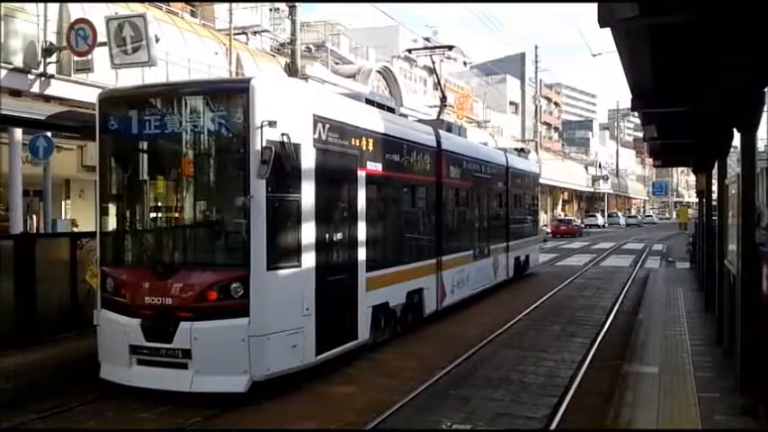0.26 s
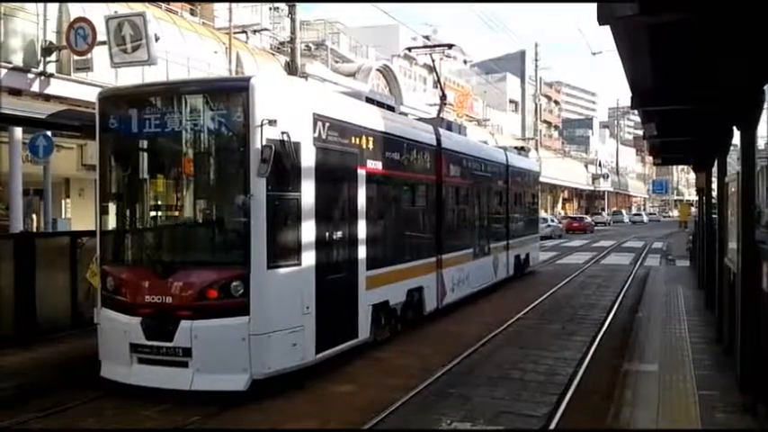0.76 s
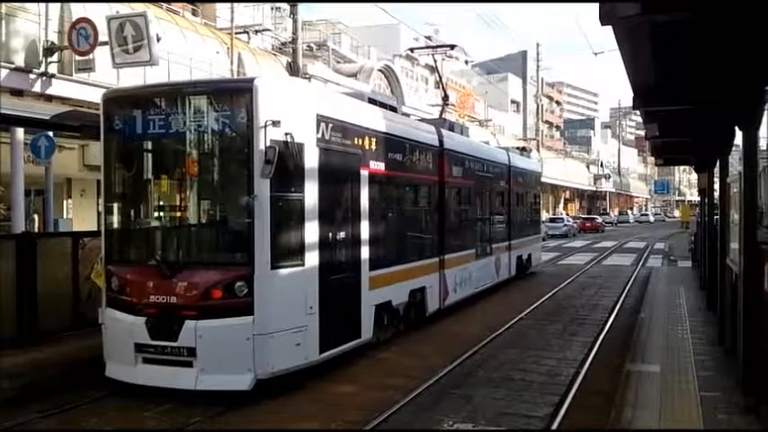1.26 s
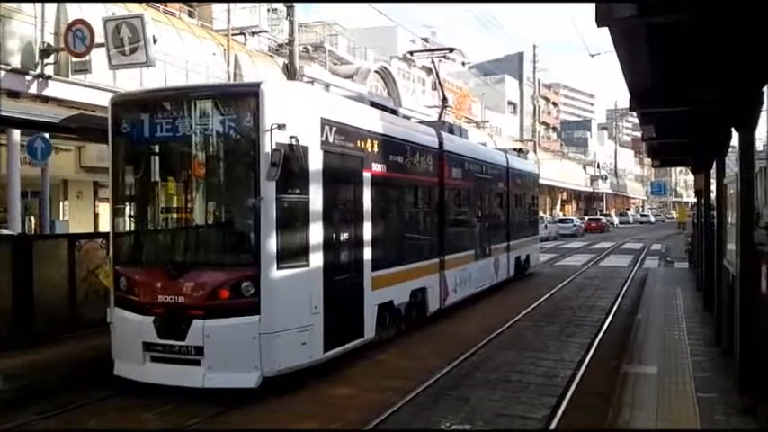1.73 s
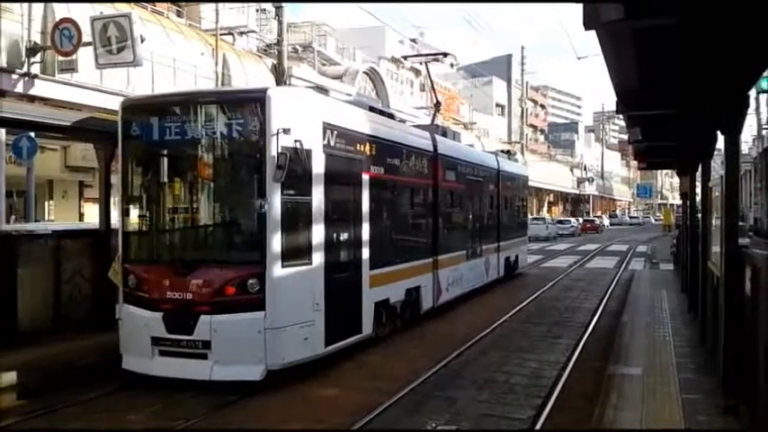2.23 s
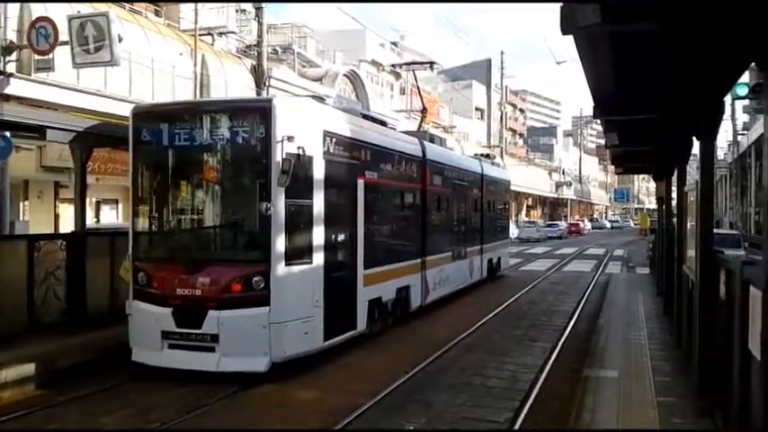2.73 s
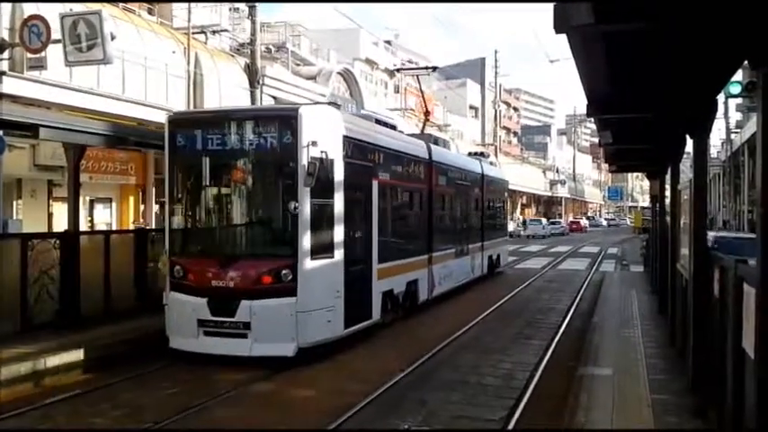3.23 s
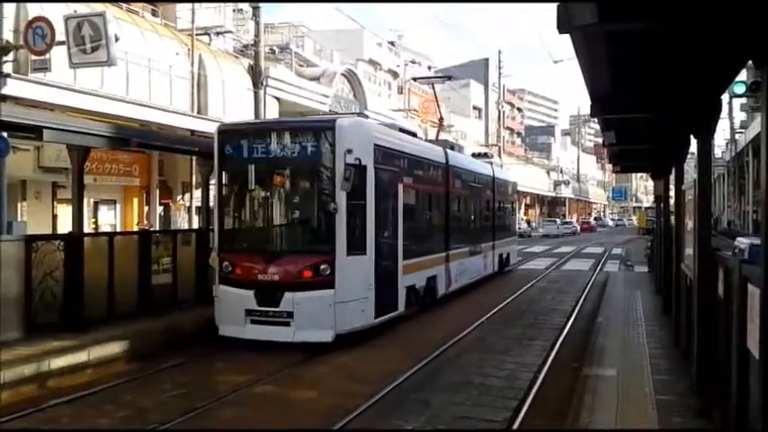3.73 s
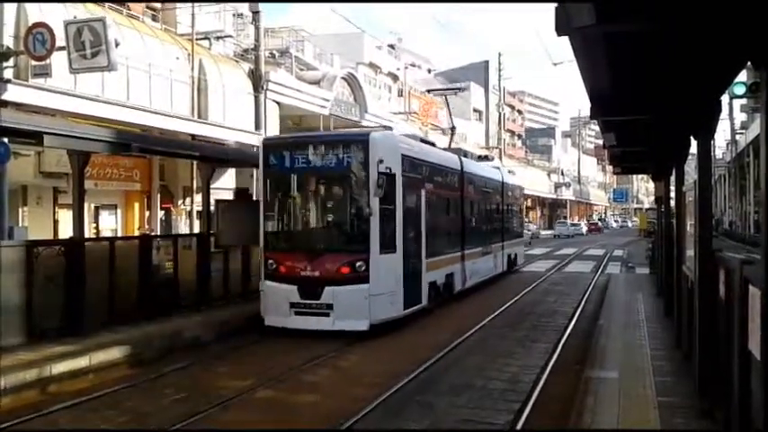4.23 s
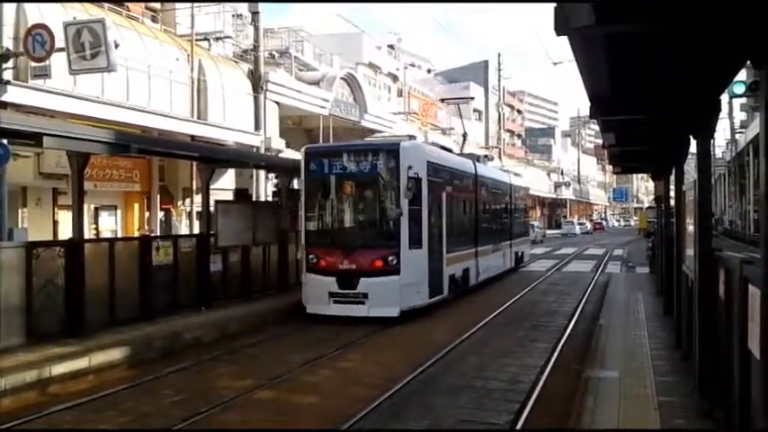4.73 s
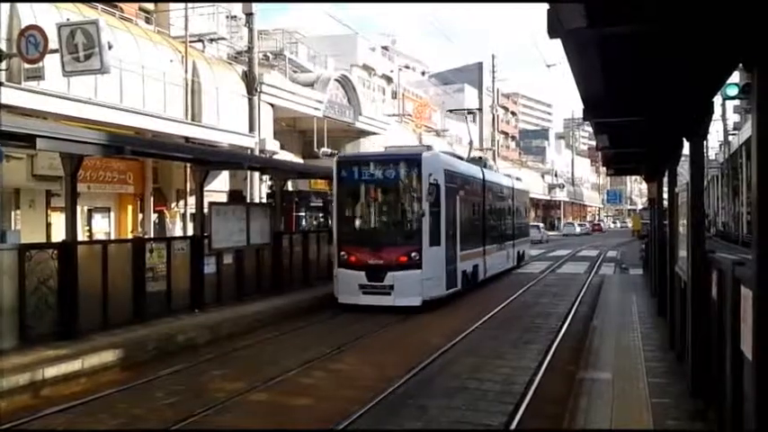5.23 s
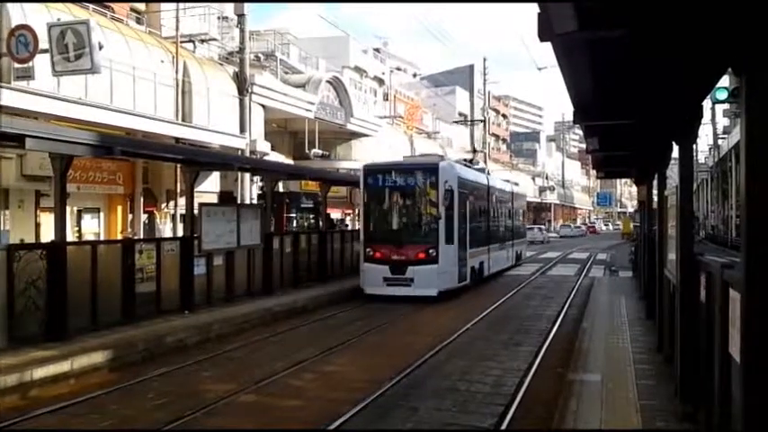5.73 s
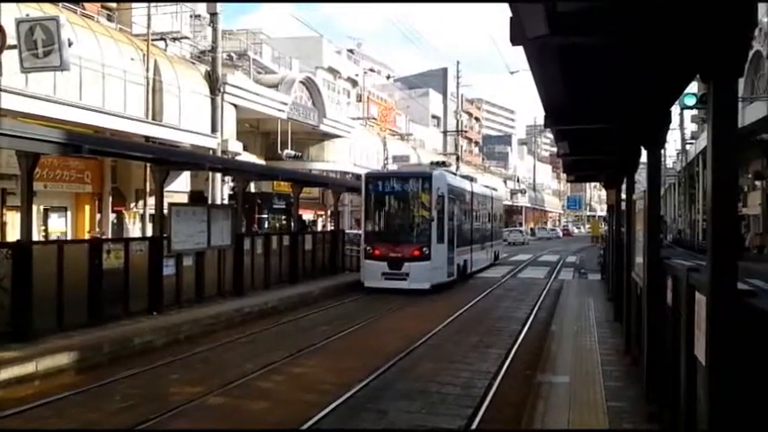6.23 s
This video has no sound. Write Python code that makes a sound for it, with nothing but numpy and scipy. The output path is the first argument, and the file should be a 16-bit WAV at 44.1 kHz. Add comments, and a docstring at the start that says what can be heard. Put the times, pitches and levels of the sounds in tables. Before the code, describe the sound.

An electric tram leaves a street stop, heard from the platform through one microphone with dulled top treble. From 0 s a low fan drone near 230 Hz hums under grainy body rumble, wheel roar and rail hiss, with tiny low swells at 0.15 and 0.6 s. A passing vehicle's hollow roar peaks around 0.3 s; its tyre noise lingers, rising slightly, and fades by about 2 s. Very faint, thin wheel squeaks come at 1.1 and 1.5 s. Running noise eases until 3 s; panels ring softly near 2 s. From 2 s motor whines around 2 and 4 kHz swell, waver and climb, joined by 3 kHz tones after 3 s. Smooth high hiss swells from 2.5 to 3.8 s. The drone nearly vanishes at 3.4 s, returns around 4.5 s with a short low swell at 5 s, then weakens. Rolling noise strengthens from 4.8 to 5.8 s and eases; the whines fade by 6 s.

```python
"""An electric tram pulls away from a street stop: rumble, wheel roar and rail hiss, shaped from noise.
One running level drives all three, while the traction drive's tones rise steadily and swell in turn.
A fan drones at its blade rate; short tones make brief low swells, low hums and two wheel squeaks.
A smooth high hiss swells once, and ringing panels and wheels, made of smeared tones, come and go.
A street vehicle of noise and smeared tones surges and dies away early on, over a deep street rumble."""
import sys
import numpy as np
from scipy import signal
from scipy.fft import rfft, irfft, next_fast_len
from scipy.io import wavfile
from scipy.ndimage import map_coordinates

SR = 44100
rng = np.random.default_rng(int(sys.argv[2]) if len(sys.argv) > 2 else 0)


def log_audio(samples):
    """Write samples as a 16-bit WAV file to the path given in sys.argv[1]."""
    # one column per channel
    frames = np.atleast_2d(samples).T
    # limit to full scale, then quantise
    limited = np.clip(frames, -1, 1)
    pcm = np.round(limited * 32767).astype(np.int16)
    wavfile.write(sys.argv[1], SR, pcm)


N = 285336
T = np.arange(N) / SR  # time of every sample [s]

# Course of the running noise; only its departure from the mean is used: (time [s], level [dB])
RUNNING_LEVEL = [(0.0, -26.5), (1.05, -31.5), (2.0, -33.5), (2.9, -35.5), (3.5, -34), (4.5, -33),
                 (4.78, -31), (5.75, -31), (6.2, -33.5)]
# Noise colours of body, wheels, rails and high hiss: (frequency [Hz], relative density [dB])
BODY_COLOUR = [(110, -44), (135, -15), (160, -10), (180, -3.5), (230, 0.5), (290, -0.5), (335, -4.5),
               (400, -7.5), (480, -10.5)]
WHEEL_COLOUR = [(200, -32), (340, -7.5), (440, -2.5), (600, 1.5), (800, -0.5), (1100, 0), (1400, -2),
                (1800, -6), (2300, -12.5), (3500, -32.5)]
RAIL_COLOUR = [(1300, -23), (1900, 6), (2300, 6), (2700, 5.5), (3000, 3), (3400, 0), (3900, -7.5),
               (4400, -4), (5150, -8.5), (5550, -12.5), (6500, -50.5), (7500, -96.5)]
HIGH_HISS_COLOUR = [(2500, -19), (3800, 7), (4700, 13), (5200, 8.5), (5600, 3.5), (6100, 12.5), (6900, 9.5),
                    (7200, -8), (7600, -42.5)]
# Mean levels of the running layers before the bumps [dB]
BODY_DB, WHEEL_DB, RAIL_DB = -25.5, -26, -33.5
# Change of each layer per dB of running level [dB/dB]
BODY_SHARE, WHEEL_SHARE, RAIL_SHARE = 0.87, 0.82, 0.45
RAIL_DB_PER_S = 0.4  # the hiss grows as the tram gathers speed
# One long swell of the smooth treble noise: (start [s], hold [s], level [dB], rise [s], fall [s])
HIGH_HISS = (2.5, 1.3, -43, 0.93, 0.45)
# Ringing body panels and wheels:
# (frequency [Hz], width [Hz], start [s], hold [s], level [dB], rise [s], fall [s])
PANEL_AND_WHEEL_RINGS = [(84, 25, 3.7, 0.25, -50, 0.1, 0.12), (164.5, 45, 4.0, 0.6, -34, 0.16, 0.077),
                         (305, 50, 1.85, 0.44, -34.5, 0.15, 0.29), (1256, 70, 1.9, 0.28, -38, 0.11, 0.15),
                         (1144, 90, 4.6, 0.4, -38.5, 0.2, 0.12), (1072, 43, 5.1, 0.5, -39, 0.15, 0.16),
                         (2550, 110, 4.6, 1.1, -41.5, 0.2, 0.18)]

# Drive tones near 2, 3, 4 and 5 kHz; each beams its own way, so they swell in turn; close pairs beat:
# (pitch at 0 s [Hz], climb [Hz/s], width [Hz], scattered to direct [ratio],
#  start [s], hold [s], level [dB], rise [s], fall [s])
DRIVE_WHINES = [ (1980, 30, 110, 2.0, 2.1, 0.44, -41.5, 1.0, 0.15),
                (2012, 28, 90, 0.4, 2.52, 0.19, -35.5, 0.036, 0.28),
                (1978, 28, 90, 0.5, 2.6, 0.26, -39, 0.14, 0.34),
                (2002, 28, 100, 0.7, 3.5, 2.3, -39, 0.17, 0.17),
                (1946, 28, 78, 0.91, 3.4, 0.98, -43, 0.19, 0.25),
                (2000, 28, 70, 0.78, 4.5, 0.82, -39.5, 0.1, 0.1),
                (1933, 48, 90, 2.2, 3.2, 1.95, -42, 0.3, 0.2), (2985, 28, 76, 0.56, 4.1, 1.6, -43, 1, 0.18),
                (3020, 28, 80, 0.4, 3.8, 0.35, -42, 0.17, 0.9),
                (2972, 59, 60, 1.6, 3.2, 1.93, -43, 0.12, 0.35),
                (3060, 28, 70, 1.6, 3.2, 1.7, -45, 0.69, 0.2),
                (3170, 37, 10, 0.3, 5.1, 0.65, -49.5, 0.15, 0.5),
                (3960, 32, 130, 2.5, 0.6, 0.7, -46, 0.35, 0.3),
                (3930, 60, 100, 2.5, 2, 0.36, -37.5, 0.32, 0.16),
                (3904, 74, 70, 0.74, 2.64, 0.37, -41, 0.14, 0.39),
                (3960, 75, 73, 1.8, 3.2, 0.4, -47, 0.47, 0.35),
                (3870, 76, 380, 5.5, 1.79, 1.14, -40.6, 0.49, 0.35),
                (4870, 95, 170, 2, 2.9, 0.35, -48, 0.48, 0.45)]

# Brief tones near 208-230 Hz: (time [s], frequency [Hz], level [dB], length [s])
LOW_SWELLS = [(0.153, 229.7, -18, 0.0097), (0.568, 208, -24, 0.017), (4.963, 220.7, -17, 0.028)]

# Fan blade tone: (time [s], level [dB])
FAN_LEVEL = [(0, -25), (1.5, -24.8), (1.9, -27.3), (3.05, -29.4), (3.35, -42), (4, -37), (4.45, -28.2),
             (5, -30.5), (5.3, -37.5), (6.47, -39)]
# Weaker tones of the turning fan: (multiple of shaft rate [ratio], mean level [dB])
SHAFT_MULTIPLES = [(6, -39), (7, -37.5), (10, -45)]
SHAFT_HZ, SHAFT_SAG_HZ_PER_S = 28.69, 0.07
SHAKE_SHARE = 0.55  # share of the drone's fading that the shaking follows [dB/dB]
# Hums of the fan and other sources: (frequency [Hz], start [s], hold [s], level [dB], rise [s], fall [s])
LOW_HUMS = [(368.7, 3.3, 0.58, -34, 0.19, 0.1), (91.5, 5.8, 0.5, -45.5, 0.16, 0.08),
            (57, 0.28, 0.2, -43.5, 0.06, 0.06), (57.3, 1.7, 0.3, -51, 0.1, 0.35)]

# Wheel squeaks: (time [s], frequency [Hz], level [dB], length [s])
WHEEL_SQUEAKS = [(1.103, 8000, -49.5, 0.062), (1.465, 7790, -55, 0.094)]

# Noise colours of the vehicle's roar and the street's rumble: (frequency [Hz], relative density [dB])
ROAR_COLOUR = [(250, -10.5), (400, -4.5), (520, -2), (700, -2.5), (930, 0.5), (1100, -10.5), (1800, -21.5),
               (3500, -31)]
STREET_COLOUR = [(15, -24.5), (25, -14.5), (37, 0.5), (60, -3), (85, -3), (110, -15)]
STREET_DB = -48
# Vehicle roar and tyres, before the lumps: (start [s], hold [s], level [dB], rise [s], fall [s])
VEHICLE_ROAR_SWELL = (0.27, 0.1, -21.5, 0.3, 0.33)
VEHICLE_TYRE_SWELL = (0.4, 0.45, -27.2, 0.25, 0.88)
# Hollow resonances in the roar, before the lumps:
# (frequency [Hz], width [Hz], start [s], hold [s], level [dB], rise [s], fall [s])
HOLLOW_RINGS = [(587, 85, 0.15, 0.29, -28, 0.3, 0.17), (295.7, 90, 0.8, 0.25, -29, 0.3, 0.12)]
# Centre of the tyres' ring: (time [s], frequency [Hz])
TYRE_CENTRE = [(0.25, 890), (0.65, 980), (0.9, 1045), (2.3, 1111)]
TYRE_WIDTH_HZ, TYRE_SKIRT_WIDTH_HZ = 110, 700
TYRE_SKIRT_DB = 7  # broad skirt relative to the narrow ring
ROAR_LUMP_DB = 0.4  # rms unevenness of the vehicle


def running():
    """Uneven rails shake body and wheels together; the rail hiss flickers and the high hiss stays smooth."""
    running_db = curve(RUNNING_LEVEL)
    effort_db = running_db - running_db.mean()
    bumps = walk(11)
    body_db = BODY_DB + BODY_SHARE * effort_db + 0.5 * bumps
    wheel_db = WHEEL_DB + WHEEL_SHARE * effort_db + 0.2 * bumps
    growth_db = RAIL_DB_PER_S * (T - T.mean())
    rail_db = RAIL_DB + RAIL_SHARE * effort_db + growth_db + 0.7 * walk(25)
    body = noise(BODY_COLOUR) * undb(body_db)
    wheels = noise(WHEEL_COLOUR) * undb(wheel_db)
    rails = noise(RAIL_COLOUR) * undb(rail_db)
    high_hiss = noise(HIGH_HISS_COLOUR) * swell(*HIGH_HISS)
    return body + wheels + rails + high_hiss + rings(PANEL_AND_WHEEL_RINGS)


def drive():
    """Switching tones climb with the speed, some clear, some smeared into a rough band."""
    return sum(tone(hz + climb * T, scatter=scatter, flutter_rate=width) * swell(*shape)
               for hz, climb, width, scatter, *shape in DRIVE_WHINES)


def low_swells():
    """Brief fluttering low tones swell and vanish within a few hundredths of a second."""
    return sum(tone(hz, scatter=0.3, flutter_rate=90) * undb(db) * pulse(time, length)
               for time, hz, db, length in LOW_SWELLS)


def fan():
    """An eight-blade fan drones over weaker multiples of its slowly sagging shaft rate."""
    shaft = SHAFT_HZ - SHAFT_SAG_HZ_PER_S * T
    blade_db = curve(FAN_LEVEL)
    blades = tone(8 * shaft, scatter=0.1, flutter_rate=9) * undb(blade_db)
    shaking = sum(tone(order * shaft, scatter=0.45, flutter_rate=7) * undb(db)
                  for order, db in SHAFT_MULTIPLES)
    # the shaking fades less than the drone
    shaking_gain = undb(SHAKE_SHARE * (blade_db - blade_db.mean()))
    return blades + shaking * shaking_gain


def low_hums():
    """Steady-pitched tones of the fan and other sources swell and fade."""
    return sum(tone(hz, scatter=0.15, flutter_rate=3.2) * swell(*shape)
               for hz, *shape in LOW_HUMS)


def squeaks():
    """A wheel rim sings thinly for a moment against the rail."""
    return sum(strand(hz, 63) * undb(db) * pulse(time, length)
               for time, hz, db, length in WHEEL_SQUEAKS)


def traffic():
    """A vehicle's uneven roar surges and fades, its tyres ring on at a rising pitch; deep rumble stays."""
    roar = noise(ROAR_COLOUR) * swell(*VEHICLE_ROAR_SWELL) + rings(HOLLOW_RINGS)
    centre = curve(TYRE_CENTRE)
    narrow = strand(centre, TYRE_WIDTH_HZ)
    skirt = undb(TYRE_SKIRT_DB) * strand(centre, TYRE_SKIRT_WIDTH_HZ)
    tyres = unit(narrow + skirt) * swell(*VEHICLE_TYRE_SWELL)
    lumps = undb(ROAR_LUMP_DB * walk(16))
    street = noise(STREET_COLOUR) * undb(STREET_DB)
    return (roar + tyres) * lumps + street


def rings(rows):
    """Resonances fed by rolling noise, each swelling and fading in its own time."""
    return sum(strand(hz, width) * swell(*shape) for hz, width, *shape in rows)


def strand(hz, width):
    """A tone whose phase and strength jitter so fast that it smears over a width in Hz."""
    return tone(hz, scatter=6.7, flutter_rate=width)


def tone(hz, scatter, flutter_rate):
    """A tone heard directly and by shifting reflections, which make it fade and flutter."""
    reflections = (walk(flutter_rate) + 1j * walk(flutter_rate)) / np.sqrt(2)
    paths = 1 + scatter * reflections
    phase = 2 * np.pi * np.cumsum(hz * np.ones(N)) / SR
    return unit(np.real(paths * np.exp(1j * phase)))


def noise(spectrum):
    """Noise of rms 1 coloured by (frequency, level) points, falling 36 dB per octave beyond them."""
    hz, db = np.array(spectrum, float).T
    size = next_fast_len(N)
    octave = np.log2(np.maximum(np.arange(size // 2 + 1) * SR / size, 1))
    beyond = np.abs(octave - np.clip(octave, np.log2(hz[0]), np.log2(hz[-1])))
    gain = undb(np.interp(octave, np.log2(hz), db) - 36 * beyond)
    white = rng.standard_normal(size)
    return unit(irfft(rfft(white) * gain, size)[:N])


def swell(start, hold, db, rise, fall):
    """Gain that rises, holds and falls, with round shoulders and exponential flanks."""
    before = np.maximum(start - T, 0) / rise
    after = np.maximum(T - start - hold, 0) / fall
    return undb(db) / np.cosh(np.minimum(before + after, 20))


def pulse(time, length):
    """Bell-shaped gain that peaks at a time and drops to 1/e one length either side."""
    return np.exp(-((T - time) / length) ** 2)


def walk(rate):
    """Smooth random wander of rms 1 through about rate random points a second."""
    points = rng.standard_normal(4096)
    return unit(map_coordinates(points, [T * rate], order=2, mode="wrap"))


def curve(rows):
    """Second column of a time table, interpolated at every sample."""
    rows = np.array(rows, float)
    return np.interp(T, rows[:, 0], rows[:, 1])


def undb(db):
    """Decibels to gain."""
    return 10 ** (np.asarray(db) / 20)


def unit(x):
    """Scale to rms 1."""
    return x / np.sqrt(np.mean(np.abs(x) ** 2))


def scene():
    """Tram and street summed into one channel."""
    tram = running() + drive() + low_swells() + fan() + low_hums() + squeaks()
    return (tram + traffic())[None]


def record(dry):
    """A steep low-pass cuts the treble above 8220 Hz."""
    top_cut = signal.ellip(10, .1, 80, 8220, fs=SR, output="sos")
    return signal.sosfilt(top_cut, dry)


dry = scene()
out = record(dry)
log_audio(out)
```